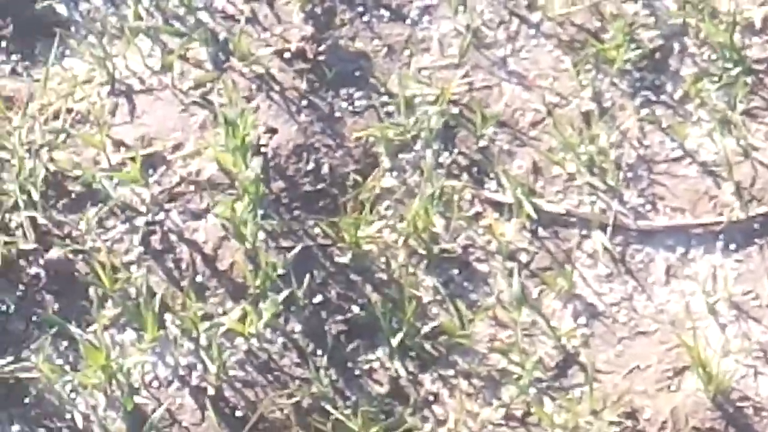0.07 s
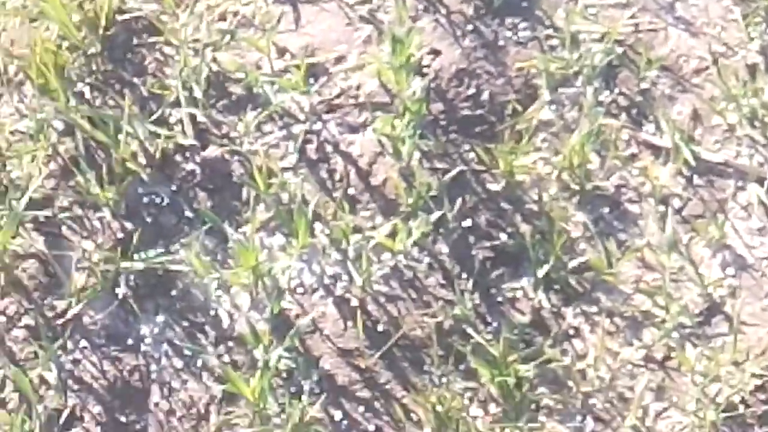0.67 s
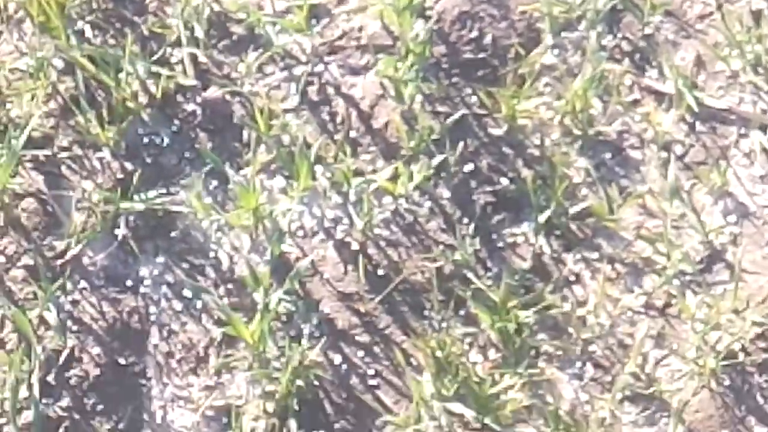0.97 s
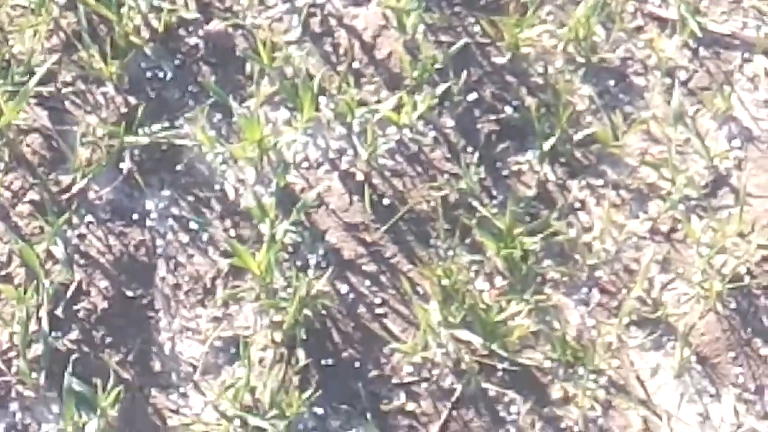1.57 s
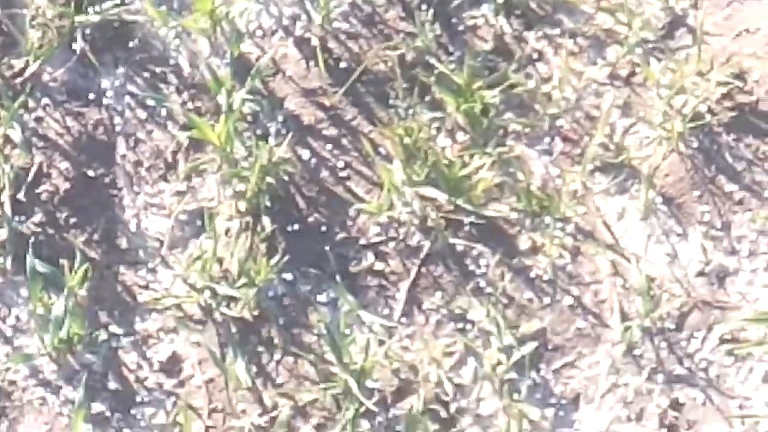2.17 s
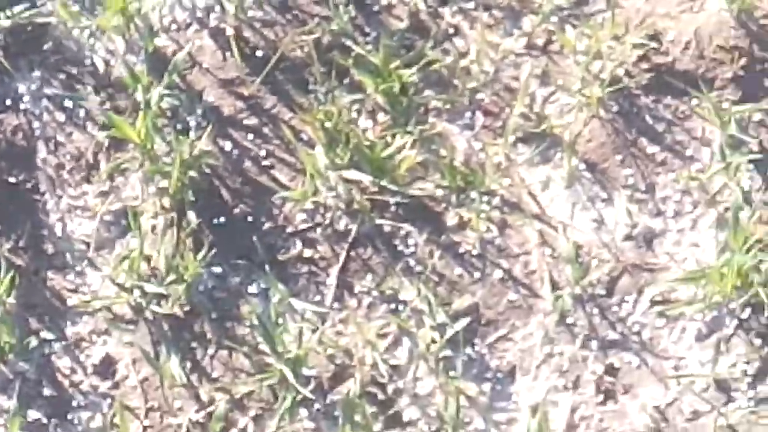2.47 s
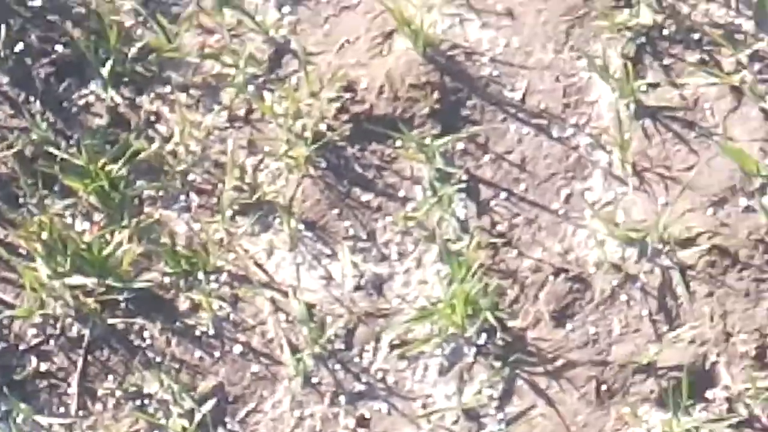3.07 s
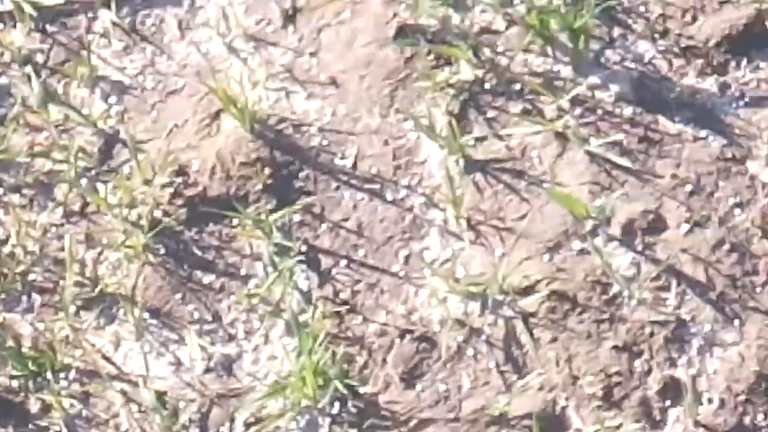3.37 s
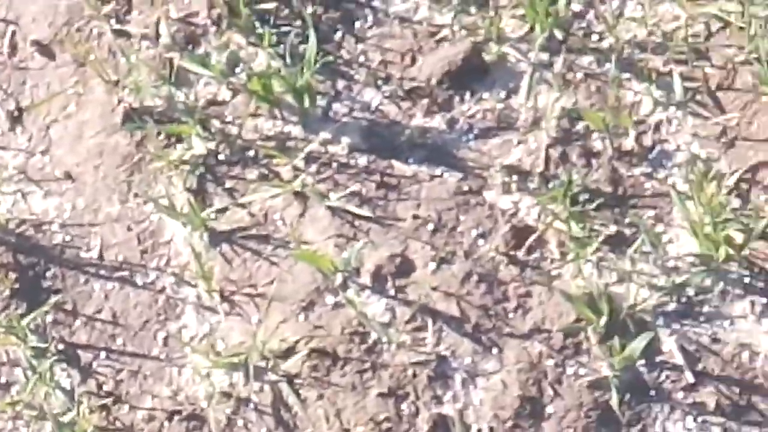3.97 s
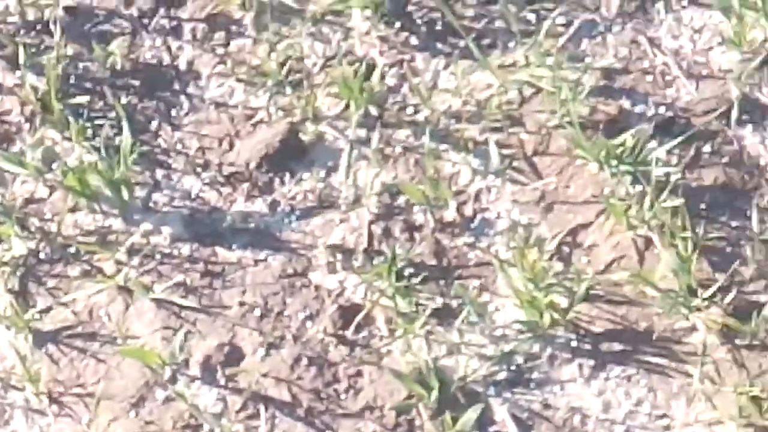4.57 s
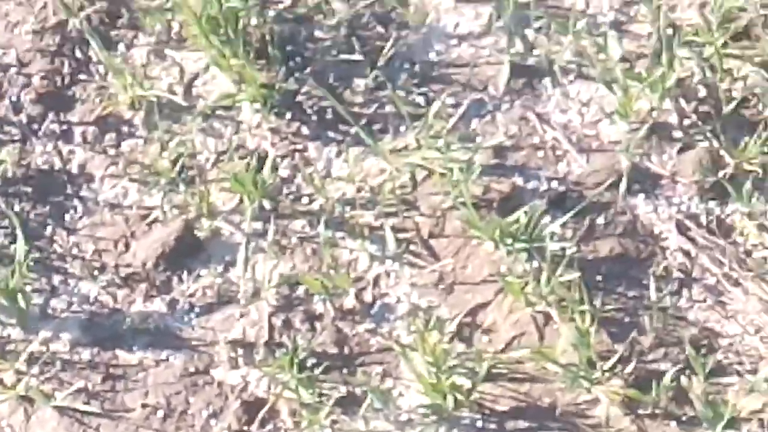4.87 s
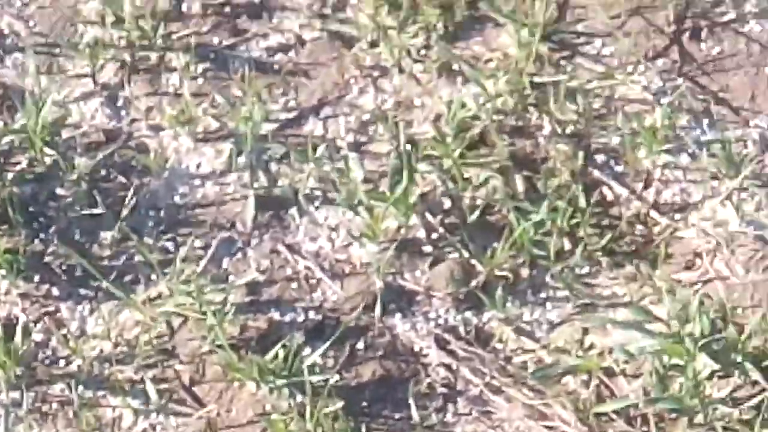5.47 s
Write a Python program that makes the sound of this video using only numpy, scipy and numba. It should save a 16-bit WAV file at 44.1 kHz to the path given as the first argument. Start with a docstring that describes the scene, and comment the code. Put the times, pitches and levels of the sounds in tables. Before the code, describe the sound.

Puffs of wind grow into heavy rumbling, rasping buffeting, with a far engine, soft clothing swishes and faint bird whistles underneath.

```python
"""Single puffs of wind thump on a camera, then build to a gust that overloads the left side.
The camera is carried over an open field, and swirls of air strike its two microphone openings (ports).
Faster air sounds louder and brighter; the hardest swings make the left microphone rasp and crack.
Underneath, a far engine drones, clothing swishes and ticks, and a bird gives thin falling whistles.
A faint high tone comes and goes."""
import sys
import numpy as np
from scipy import signal
from scipy.fft import rfft, irfft
from scipy.io import wavfile
from scipy.ndimage import uniform_filter1d, minimum_filter1d, map_coordinates
from numba import njit

SR = 44100
rng = np.random.default_rng(int(sys.argv[2]) if len(sys.argv) > 2 else 0)


def output_pcm(signal):
    """Save a mono or channel-first signal as 16-bit PCM at the path in sys.argv[1].

    Samples are clipped to [-1, 1] before scaling.
    """
    pcm = np.clip(np.atleast_2d(signal).T, -1, 1) * 32767
    wavfile.write(sys.argv[1], SR, np.round(pcm).astype(np.int16))


N = 242991
TIME = np.arange(N) / SR


def gain(db):
    """Turn decibels into a number to multiply by."""
    return 10 ** (np.asarray(db) / 20)


def normalize(x):
    """Scale a signal so its average strength (rms) is 1."""
    return x / np.sqrt(np.mean(x ** 2))


def wobble(per_second):
    """A smooth random drift of strength 1 that picks new values at the given rate."""
    held = rng.standard_normal(N)[(TIME * per_second).astype(int)]
    span = int(SR / per_second)
    return normalize(uniform_filter1d(uniform_filter1d(held, span), span))


def cut(x, hz, kind, order):
    """Keep the "low" or the "high" side of a frequency."""
    return signal.sosfilt(signal.butter(order, hz, kind, fs=SR, output="sos"), x)


def noise(colour):
    """Noise of strength 1, shaped by rows of (frequency_hz, level_db)."""
    hz, db = np.transpose(colour)
    bins_hz = np.maximum(np.arange(N // 2 + 1) * SR / N, 1)
    shape = gain(np.interp(np.log(bins_hz), np.log(hz), db))
    return normalize(irfft(rfft(rng.standard_normal(N)) * shape, N))


def stereo_noise(colour, side_db, left_db):
    """Noise with a shared part and a part that differs between left and right."""
    mid, side = noise(colour), gain(side_db) * noise(colour)
    return normalize(np.array([gain(left_db) * (mid + side), mid - side]))


def blurred_tone(hz, width_hz):
    """A tone smeared into a narrow band of noise."""
    blur = cut(rng.standard_normal((2, N)), width_hz / 2, "low", order=2)
    phase = 2 * np.pi * np.cumsum(hz) / SR
    return normalize(blur[0] * np.cos(phase) + blur[1] * np.sin(phase))


# The tone colour of the open field: frequency_hz, level_db
FIELD_COLOUR = [(40, -15), (200, 9.5), (290, 8.5), (370, -0.5), (480, -1.5), (590, 0), (750, 0.5),
                (840, -5.5), (950, -2.5), (1200, -13.5), (1700, -30), (3000, -33.5), (8000, -47.5),
                (15000, -55.5)]
def field_air():
    """The dull, nearly steady hush of far-off air."""
    return stereo_noise(FIELD_COLOUR, side_db=-12.5, left_db=-1.5) * gain(-43 + 0.32 * wobble(1))


def far_engine(pitch_hz=277.7):
    """A distant engine drones on one low, wavering note."""
    hz = pitch_hz * (1 + 0.007825 * wobble(3) + 0.0279 * wobble(60))
    drone = np.sqrt(2) * np.sin(2 * np.pi * np.cumsum(hz) / SR)
    return drone * gain(-41 + 2.5 * wobble(22)) * gain([[.5], [-.5]])


# Swells of a faint high tone: middle_s, half_length_s, pitch_hz, level_db
TONE_SWELLS = [(0.2, 0.14, 3180, -70.5), (1.3, .2, 3150, -78.5), (2.2, .12, 3142, -76),
               (3.755, 0.02, 3300, -72.5)]
def thin_tone():
    """A thin tone swells and fades far away."""
    out = np.zeros(N)
    for middle, half_length, hz, db in TONE_SWELLS:
        swell = np.exp(-.5 * ((TIME - middle) / half_length) ** 2)
        out += blurred_tone(np.full(N, hz), width_hz=150) * gain(db) * swell
    return out * gain([[-2], [0]])


# Every whistle drops, almost holds, then bends down: share_of_length, share_of_fall, level_db
WHISTLE_SHAPE = [(0, 0, -8), (.08, .04, 0), (.22, .26, -3), (.48, .33, -1), (.6, .42, 1), (.75, .72, -1),
                 (.88, .89, -1), (1, 1, -7)]
# The bird's whistles: start_s, length_s, first_hz, last_hz, level_db
WHISTLES = [(1.106, 0.19, 6200, 4350, -65), (1.44, 0.06, 4570, 4440, -76), (1.55, .05, 4450, 4300, -68),
            (2.919, 0.19, 5900, 4130, -71), (3.355, 0.2, 5750, 3880, -65.5),
            (3.556, 0.034, 3550, 3350, -60), (4.014, 0.2, 5680, 4130, -64.5),
            (4.998, 0.24, 5720, 4130, -63)]
def bird():
    """Thin falling whistles from far away, blurred by the moving air."""
    share, fall, shape_db = np.transpose(WHISTLE_SHAPE)
    out, waver = np.zeros(N), 1 + 0.011 * wobble(400)
    for start, length, first_hz, last_hz, db in WHISTLES:
        progress = (TIME - start) / length
        hz = first_hz + (last_hz - first_hz) * np.interp(progress, share, fall)
        loudness = gain(db + np.interp(progress, share, shape_db)) * (progress > 0) * (progress < 1)
        out += np.sin(2 * np.pi * np.cumsum(hz * waver) / SR) * loudness
    return out * gain(2.5 * wobble(60)) * gain([[-3], [-2]])


# The tone colours of the fabric's high swish and lower rub: frequency_hz, level_db
SWISH_COLOUR = [(3500, -34), (4700, -13), (5250, -2.5), (5650, -3), (6150, -6.5), (7000, -13), (8400, -33),
                (9300, -32), (12000, -34), (15000, -39.5)]
RUB_COLOUR = [(1000, 1), (1500, -0.5), (2200, -11), (2700, -3.5), (3150, 0), (3700, -6), (4500, -8),
              (7000, -21), (9000, -36)]
# Strokes of fabric: start_s, length_s, fade_in_s, swish_db, rub_db, swish_hz, ringing_share
STROKES = [(-0.03, 0.28, 0.011, -65.5, -58, 5810, 0), (0.172, 0.34, 0.012, -57.5, -75, 5820, 0.02),
           (0.616, 0.14, .012, -70.5, -61.5, 5780, 0.2), (0.931, 0.54, 0.027, -56.5, -64, 5830, 0.23),
           (1.098, 0.18, 0.0094, -61, -56.5, 5600, .2), (1.504, 0.35, .012, -62, -64.5, 5670, .3),
           (1.909, .09, 0.0084, -63, -66, 5930, 0.1), (2.098, 0.25, 0.011, -72, -64.5, 5610, 0.2),
           (2.393, 0.21, .01, -61, -60, 5830, 0.04), (2.589, 0.2, 0.019, -60, -58.5, 5660, 0.25),
           (2.76, 0.23, .015, -60, -73, 5480, .65), (3.202, 0.23, 0.018, -63.5, -67, 5390, .35),
           (4.144, 0.079, .015, -62, -79.5, 5640, 0.5), (4.343, 0.13, 0.0091, -57.5, -58.5, 5580, 0.3),
           (4.58, 0.37, .012, -61.5, -87.5, 5630, 0.1)]
def clothing(resting_hz=5690, fade_out_s=.03):
    """Fabric slides over fabric: a quicker stroke swishes higher, and a steady one almost rings."""
    swish_power, rub_power = gain(-72.5) ** 2, gain(-68) ** 2  # stirring between strokes
    ring_power, pitch_pull = 0, 0
    for start, length, fade_in_s, swish_db, rub_db, hz, ringing in STROKES:
        fade_in = (1 + np.tanh((TIME - start) / fade_in_s / 2)) / 2
        fade_out = (1 + np.tanh((start + length - TIME) / fade_out_s / 2)) / 2
        stroke = fade_in * fade_out
        power = stroke * gain(swish_db) ** 2
        swish_power += power
        ring_power += power * ringing
        rub_power += stroke * gain(rub_db) ** 2
        pitch_pull += power * (hz - resting_hz)
    speed = 1 + pitch_pull / swish_power / resting_hz + 0.019 * wobble(25)
    weave = stereo_noise(SWISH_COLOUR, side_db=0, left_db=-4.5)
    # Running through the noise faster raises its pitch.
    swish = np.array([map_coordinates(side, [np.cumsum(speed)], order=3, mode="wrap") for side in weave])
    # Sliding steadily over the ribs of the weave narrows the swish to a ring.
    ring = np.array([blurred_tone(resting_hz * speed, width_hz=330) for _ in range(2)])
    ring = normalize(ring * gain([[-4], [0]]))
    sliding = swish * np.sqrt(swish_power - ring_power) + ring * np.sqrt(ring_power)
    catch_db = 2 * wobble(120) + 1.6 * wobble(22)  # threads catch unevenly
    rub = stereo_noise(RUB_COLOUR, side_db=4, left_db=-4.5) * np.sqrt(rub_power)
    return sliding * gain(catch_db - 1) + rub * gain(2.6 * wobble(80))


# Small ticks on the camera body: start_s, level_db
TICKS = [(1.209, -27), (2.389, -21.5)]
def ticks(decay_s=0.0011):
    """Each tick is one sudden push that quickly relaxes."""
    out = np.zeros(N)
    for start, db in TICKS:
        out += gain(db) * (TIME >= start) * np.exp(-np.abs(TIME - start) / decay_s)
    return cut(out, 5820, "low", order=3) * gain([[3], [-5]])


# The tone colours of a crack's rough rasp and high fizz: frequency_hz, level_db
RASP_COLOUR = [(1200, -12.5), (2600, 0), (3600, -7.5), (5000, -14.5), (7000, -23.5), (10000, -43)]
FIZZ_COLOUR = [(3000, -20.5), (6000, 4.5), (8000, 4.5), (12000, -0.5), (15000, -6), (16000, -16.5)]
# The loudest cracks of the overloaded left microphone: middle_s, rasp_db, fizz_db, decay_s
CRACKS = [(3.65, -51, -64, 0.0016), (3.8066, -48, -61, 0.00077), (3.8227, -43.5, -58, .0008),
          (3.845, -38, -57, 0.00059), (4.3754, -37, -57, 0.00087), (4.4087, -23.5, -46, 0.0006),
          (4.477, -48, -55, .0018), (4.4848, -43, -60, .0008), (4.501, -28.5, -64, 0.0012),
          (4.5403, -25, -39, 0.0011), (4.5585, -34.5, -51, 0.00064), (4.5866, -43, -64, 0.00074),
          (4.6188, -41, -58, 0.0011), (4.6482, -28.5, -49, 0.00076), (4.6569, -28, -50, 0.00095),
          (4.6757, -38, -53, 0.00094), (4.686, -31, -49, .0008), (4.6956, -30.5, -49, 0.0007),
          (4.709, -29, -62, 0.0009), (4.7205, -34, -58, 0.0013), (4.7724, -36, -54, 0.00088),
          (4.793, -43, -63, 0.0019), (4.8096, -38, -59, .0008), (4.8267, -32, -48, 0.00073),
          (4.8636, -34, -50, 0.0012), (4.8967, -46, -57, .0016), (4.9181, -29, -54, 0.00068),
          (4.9483, -40, -57, 0.00088), (5.0466, -39.5, -58, 0.00064), (5.1202, -32, -48, 0.00071),
          (5.1443, -29.5, -55, .0008), (5.1627, -34, -53, 0.0018), (5.1916, -28, -53, 0.00057),
          (5.2204, -38.5, -59, 0.00093), (5.258, -34, -66, 0.0017), (5.2692, -31, -46, .0008),
          (5.2794, -23, -41.5, 0.0013), (5.287, -34, -54, .0008), (5.344, -41, -70, 0.00082),
          (5.36, -26, -46, .0008), (5.4182, -32.5, -53, 0.00085)]
def cracks(hiss_db=-21.5, hiss_decay_s=0.0035):
    """Short rough cracks; a faint hiss added around each makes it sound fuller."""
    rasp, fizz = np.zeros(N), np.zeros(N)
    for middle, rasp_db, fizz_db, decay in CRACKS:
        apart = np.abs(TIME - middle)
        burst = np.exp(-apart / decay) + gain(hiss_db) * np.exp(-apart / hiss_decay_s)
        rasp += gain(rasp_db + 7) * burst
        fizz += gain(fizz_db + 6.5) * burst
    return rasp * noise(RASP_COLOUR) + fizz * noise(FIZZ_COLOUR)


def microphone_strain(pressure):
    """The microphone rasps on every swing that comes near its limit."""
    load = uniform_filter1d(np.tanh(pressure) ** 6, size=60)
    rasp = noise([(800, -14.5), (2400, -2), (4000, -12), (6500, -22.5),
                  (8000, -27), (13000, -27), (16000, -37.5)])
    return gain(-27) * load * rasp


@njit
def moving_lowpass(x, cutoff_hz, damping):
    """Three filters in a row remove the treble above a moving cutoff."""
    out, band, low = np.empty(len(x)), np.zeros(3), np.zeros(3)
    for i in range(len(x)):
        step = np.tan(np.pi * cutoff_hz[i] / SR)
        sample = x[i]
        for k in range(3):
            slope = (band[k] + step * (sample - low[k])) / (1 + step * (step + damping))
            sample = low[k] + step * slope
            band[k], low[k] = 2 * slope - band[k], 2 * sample - low[k]
        out[i] = sample
    return out


def tiny_swirls(per_second, scatter_db):
    """Tiny swirls of air push and pull at uneven times, with uneven strength."""
    gap, direction, strength = rng.standard_normal((2000, 3)).T
    at = (np.cumsum(np.exp(.55 * gap)) / per_second * SR).astype(int)
    pushes = np.sign(direction) * gain(scatter_db * strength)
    return normalize(np.bincount(at[at < N], pushes[at < N], N))


def rumble(flow_db, puffs, lull_db, cutoff_hz, db_per_octave, damping,
           flutter_db, crackle_octaves, smooth_db, heave_db):
    """Churning air at one port: faster air is louder and holds smaller swirls, so it is brighter too."""
    power, brightening = gain(flow_db) ** 2, 0
    for peak_s, db, half_length, extra_octaves in puffs:
        width = half_length * np.where(TIME < peak_s, 0.71, 1.114)  # arrives faster than it leaves
        puff = gain(db) ** 2 * np.exp(-.5 * ((TIME - peak_s) / width) ** 2)
        power += puff
        brightening += extra_octaves * puff
    force_db = 10 * np.log10(power) - lull_db + flutter_db * wobble(55)
    octaves = (force_db + 16.5) / db_per_octave + brightening / power
    octaves += crackle_octaves * np.tanh(wobble(260))
    moving_hz = np.clip(cutoff_hz * 2 ** octaves, 200, 2840)  # the smallest swirls set the top
    # Single swirls sputter over a smoother stream.
    push = tiny_swirls(per_second=190, scatter_db=4.5) + gain(smooth_db) * rng.standard_normal(N)
    push = cut(push, 80.5, "high", order=3)
    push = cut(push, 130, "low", order=1)
    pressure = moving_lowpass(push, moving_hz, damping)
    # Even out the swings, so the airflow sets their size and chance only their shape.
    swing = np.sqrt(uniform_filter1d(uniform_filter1d(pressure ** 2, size=600), size=600))
    # The largest swirls heave below the rumble.
    heave = gain(heave_db) * noise([(5, -8.5), (15, -3), (35, -18), (62, 4), (90, -11), (400, -90.5)])
    return gain(force_db + 1.5) * (pressure / swing + heave)


def add_slaps(stream, slaps, knock_db, thump_db, thump_ratio):
    """A breaking swirl shoves the stream aside: a short knock inside a slower push and pull."""
    out, calm = np.zeros(N), np.ones(N)
    signs = np.sign(rng.standard_normal(len(slaps)))
    for (middle, db, hz), sign in zip(slaps, signs):
        near = slice(*np.searchsorted(TIME, [middle - .012, middle + .012]))
        age = TIME[near] - middle
        quick = np.pi * hz * age
        slow = quick * thump_ratio
        knock = gain(knock_db) * (1 - 2 * quick ** 2) * np.exp(-quick ** 2)
        thump = gain(thump_db) * 2 * slow * np.exp(-slow ** 2)
        out[near] += sign * gain(db) * (knock + thump)
        calm[near] *= 1 - 0.71 * np.exp(-(age / 0.001) ** 2)  # the stream dips under the slap
    return stream * calm + out


# The airflow over each port, building from breeze to gust: time_s, left_db, right_db
AIRFLOW = [(0, -30, -37.5), (1.0, -34, -34.5), (1.6, -35.5, -38), (2.3, -29, -39), (2.6, -40, -41.5),
           (3.25, -38, -36), (3.4, -28.5, -36), (3.75, -19, -39.5), (4.0, -19, -26), (4.28, -20, -27),
           (4.56, -13.5, -28.5), (4.66, -4, -23), (4.72, -6, -30), (4.86, -9.5, -31.5), (4.98, -18, -20.5),
           (5.15, -3, -18.5), (5.33, -8.5, -25), (5.45, -16.5, -22)]
# Moments when the stream lifts off the left port: middle_s, drop_db, half_length_s
LULLS = [(3.33, 9, 0.0041), (3.643, 3, 0.0043), (3.66, 1, 0.0044), (3.707, 1, 0.0093), (3.918, 6.5, 0.0036),
         (3.943, 3, 0.0034), (4.459, 11, 0.0035), (4.489, 5, 0.0036), (4.527, 3.5, 0.0094),
         (4.572, 2.5, 0.0053), (4.612, 6.5, 0.0054), (4.754, 7, 0.013), (4.803, 8.5, 0.0052),
         (4.844, 8, 0.0056), (4.886, 6, 0.012), (4.909, 6, .004), (4.99, 4, 0.0074), (5.039, 7, 0.0035),
         (5.108, 4, 0.0079), (5.209, 2.5, .006), (5.265, 6, .004), (5.381, 3.5, 0.0066),
         (5.464, 8.5, 0.024)]
# Puffs of swirling air that strike each port: peak_s, level_db, half_length_s, brighter_octaves
LEFT_PUFFS = [(0.061, -10, 0.0092, 0), (0.222, -9.5, 0.0062, -0.81), (0.399, -22, 0.0076, 0.7),
              (0.538, -17, 0.011, -0.66), (0.579, -12, 0.0041, -1.5), (1.043, -20.5, 0.0077, -0.16),
              (1.094, -21.5, 0.017, 0.33), (1.202, -18.5, 0.0048, -0.2), (1.309, -18, 0.0046, -1.2),
              (1.676, -20.5, 0.01, -0.08), (1.848, -11, 0.02, -0.56), (2.029, -20.5, 0.0069, -0.05),
              (2.159, -24.5, 0.0074, -0.8), (2.393, -24.5, 0.02, 0.1), (2.495, -26.5, 0.015, 0.56),
              (2.663, -18, 0.008, -0.18), (3.099, -26.5, 0.015, -0.8), (3.312, -8, 0.017, -1.16),
              (3.352, -13.5, 0.0068, -1.35), (3.38, -14.5, 0.0041, -0.04), (3.404, -19.5, 0.0075, 0.1),
              (3.517, -6.5, 0.0055, -2.8), (3.611, -8, 0.013, -0.48), (3.652, -7.5, 0.01, 0),
              (3.79, -14, 0.014, -2), (3.68, -8.5, 0.01, -0.5), (3.825, -10, 0.027, -1.1),
              (3.932, -10, 0.02, -0.1), (4.045, -18, 0.027, -2), (4.13, -11.5, 0.012, 0.07),
              (4.209, -8.5, 0.009, -1.6), (4.305, -3, 0.0034, -1), (4.369, -9.5, 0.022, -0.1),
              (4.417, -6, 0.0087, 2), (4.476, -0.5, 0.0086, -1), (4.499, 0.5, 0.0029, -0.3),
              (4.539, 4.5, 0.0029, -1.2), (4.588, -6, 0.011, -0.4), (4.764, -9.5, 0.028, 2.6),
              (4.832, -5, 0.0047, 2), (4.86, -1, 0.0027, 3), (4.919, -4, 0.013, 0.7),
              (4.964, -7.5, 0.006, -0.2), (5.034, -10.5, 0.021, -0.3), (5.271, -8.5, 0.016, 6),
              (5.414, -4.5, 0.0052, -1.0), (5.489, -13.5, 0.0048, 0.2)]
RIGHT_PUFFS = [(0.417, -20.5, 0.021, 0.06), (0.539, -27, 0.01, -0.34), (0.984, -15.5, 0.021, -0.32),
               (1.172, -26, 0.019, 0.43), (1.396, -21.5, 0.0026, -0.029), (3.001, -21.5, 0.013, -0.88),
               (3.054, -21, 0.0071, -0.67), (3.45, -17, 0.0089, -0.33), (3.849, -26.5, 0.025, -0.054),
               (4.241, -11, 0.0053, -1.6), (4.324, -17.5, 0.026, -0.89), (4.451, -15, 0.0054, 0.72),
               (4.617, -17.5, 0.031, 0.43), (4.76, -14, 0.017, 0.007), (4.875, -14.5, 0.024, 0.38),
               (5.046, -18, 0.01, 0.75), (5.267, -12, 0.0056, 0.51)]
# The hardest swirls, which break right on a port: middle_s, level_db, knock_hz
LEFT_SLAPS = [(0.0568, -11.5, 592), (0.0718, -13, 850), (0.2212, -10.5, 697), (0.5447, -15.5, 398),
              (0.5815, -22, 440), (1.035, -20, 450), (1.8433, -4, 790), (1.8748, -12.5, 575),
              (3.2866, -16.5, 488.5), (3.3056, -16, 733), (3.3226, -13.5, 700), (3.3372, -14, 720),
              (3.3764, -17.5, 700), (3.4024, -16, 553), (3.5164, -7.5, 585), (3.5997, -2.5, 933),
              (3.616, -17, 900), (3.6252, -16, 950), (3.6496, -8, 1050), (3.6552, -8.5, 900),
              (3.682, -8, 877), (3.8067, -9, 984), (3.824, -10.5, 865), (3.8382, -9, 1150),
              (3.8456, -5, 986), (3.8796, 3, 665), (3.905, -5, 850), (3.9205, -4, 970),
              (3.9311, -5.5, 1060), (3.952, -1.5, 705), (3.974, -9, 580), (3.992, -16.5, 633),
              (4.1238, 0, 720), (4.1352, -10.5, 697), (4.1449, -10, 706), (4.2154, -6, 675),
              (4.306, -13.5, 860), (4.3223, -11, 573), (4.3496, -1.5, 640), (4.376, -3.5, 906),
              (4.4117, -7, 1000), (4.4228, -0.5, 910), (4.447, -1.5, 890), (4.476, 0.5, 930),
              (4.5002, -4, 1183), (4.5388, 12, 950), (4.5576, -0.5, 910), (4.582, -8, 980),
              (4.6028, -4, 900), (4.633, -2.5, 1300), (4.6482, 1, 930), (4.677, 1, 1170),
              (4.6955, -3, 1034), (4.7239, 0, 1296), (4.7709, 2.5, 1030), (4.7906, 2, 1190),
              (4.8105, 0.5, 850), (4.8353, -8, 800), (4.8551, -0.5, 1050), (4.8973, -0.5, 658),
              (4.917, 2, 1060), (4.948, -2, 950), (4.9646, -5, 925), (5.018, -9, 840), (5.0485, -3, 1020),
              (5.065, -2, 950), (5.0892, 2, 790), (5.1206, -5, 945), (5.1425, -4, 980), (5.1907, 2, 1300),
              (5.1994, 0, 1020), (5.226, -16, 930), (5.237, -1, 1140), (5.2581, 2.5, 1310),
              (5.2776, 3, 1230), (5.3441, 0, 1160), (5.3608, 9, 1140), (5.397, -5, 800),
              (5.4188, -0.5, 710)]
RIGHT_SLAPS = [(0.403, -34, 450), (0.4208, -17.5, 400), (0.9857, -14, 470), (1.0088, -23, 447),
               (1.3951, -22, 486), (3.4508, -25, 567), (4.24, -26, 503)]
def wind():
    """Each port gets its own rumble and slaps; the left one faces the wind and overloads."""
    times, *levels = np.transpose(AIRFLOW)
    left_db, right_db = [np.interp(TIME, times, db) for db in levels]
    lull_db = sum(drop * np.exp(-((TIME - middle) / width) ** 2) for middle, drop, width in LULLS)
    left = rumble(left_db, LEFT_PUFFS, lull_db, cutoff_hz=818, db_per_octave=7, damping=1.86,
                  flutter_db=1.5, crackle_octaves=0.74, smooth_db=-4, heave_db=-32)
    right = rumble(right_db, RIGHT_PUFFS, lull_db=0, cutoff_hz=960, db_per_octave=8, damping=1.98,
                   flutter_db=2, crackle_octaves=0.3, smooth_db=-5, heave_db=-30)
    left = add_slaps(left, LEFT_SLAPS, knock_db=-5, thump_db=-5, thump_ratio=0.31)
    right = add_slaps(right, RIGHT_SLAPS, knock_db=0, thump_db=3.5, thump_ratio=0.5)
    return np.array([left + microphone_strain(left) + cracks(), right])


def scene():
    """The wind on top of all the quieter sounds, as a left and a right channel."""
    return wind() + field_air() + far_engine() + clothing() + ticks() + bird() + thin_tone()


def record(dry, ceiling=1.0, top_hz=15800):
    """A limiter turns each side down around its largest swings; then the highest treble is cut."""
    volume = minimum_filter1d(ceiling / np.maximum(np.abs(dry), ceiling), size=111)
    volume = uniform_filter1d(uniform_filter1d(volume, size=55), size=55)
    treble_cut = signal.ellip(8, .02, 70, top_hz, fs=SR, output="sos")
    return signal.sosfilt(treble_cut, dry * volume)


dry = scene()
out = record(dry)
output_pcm(out)
```